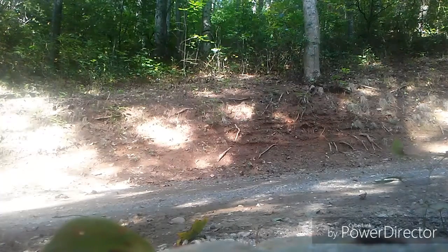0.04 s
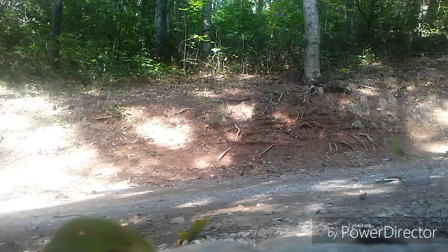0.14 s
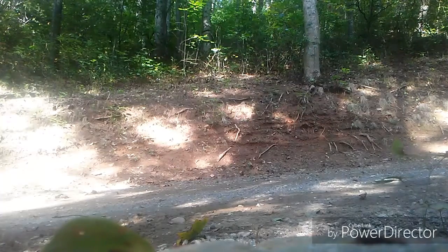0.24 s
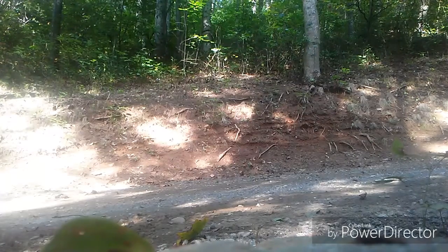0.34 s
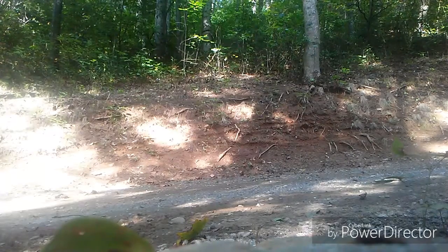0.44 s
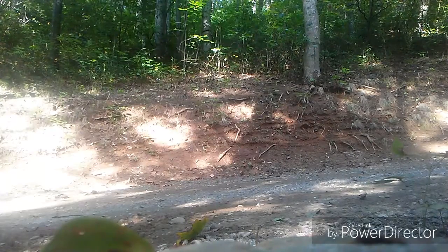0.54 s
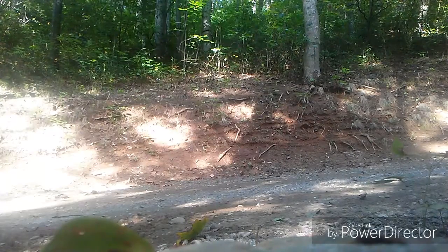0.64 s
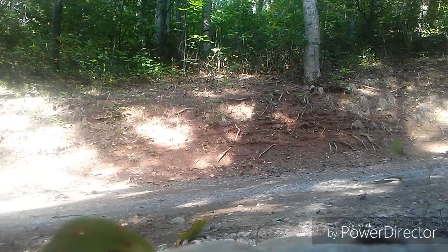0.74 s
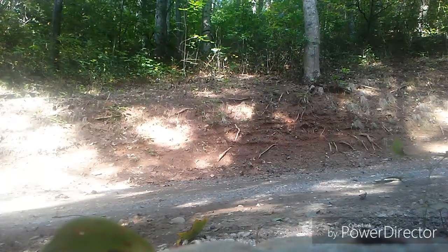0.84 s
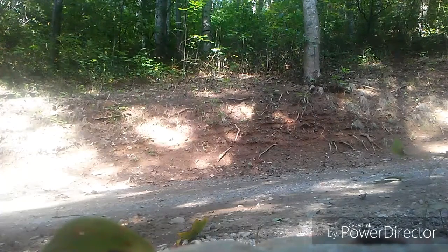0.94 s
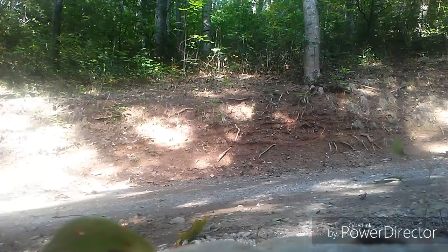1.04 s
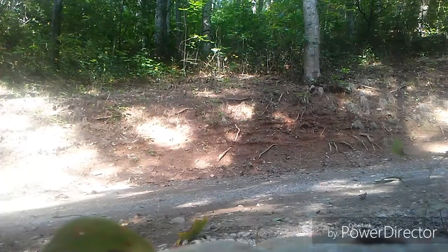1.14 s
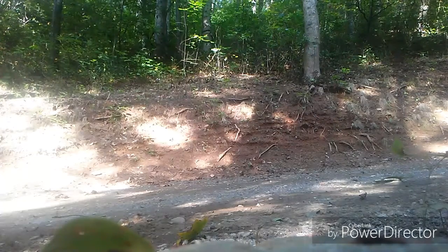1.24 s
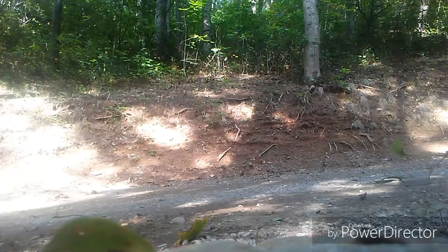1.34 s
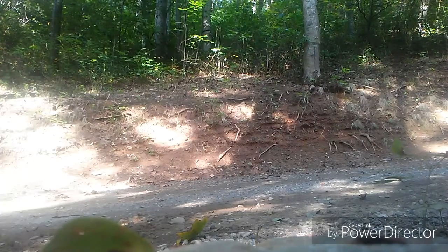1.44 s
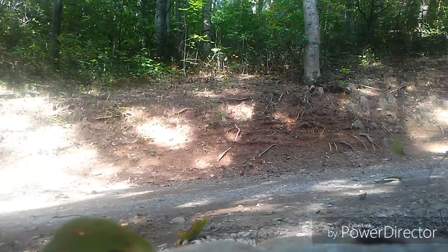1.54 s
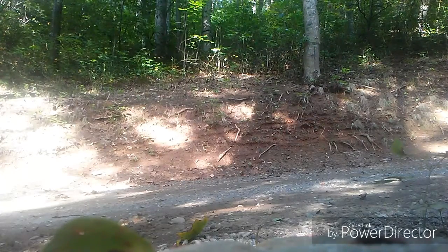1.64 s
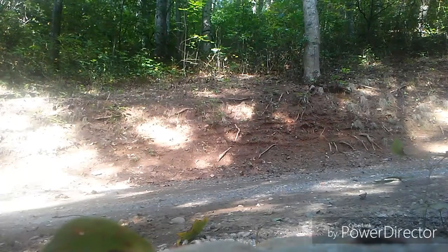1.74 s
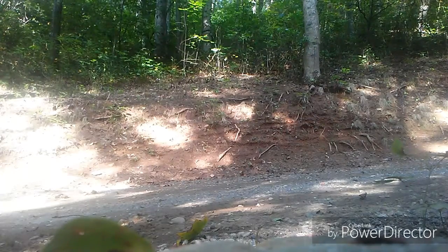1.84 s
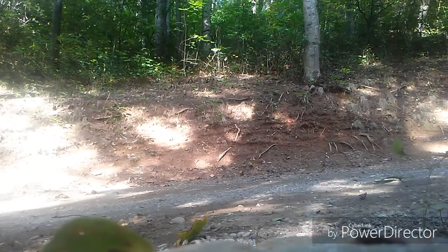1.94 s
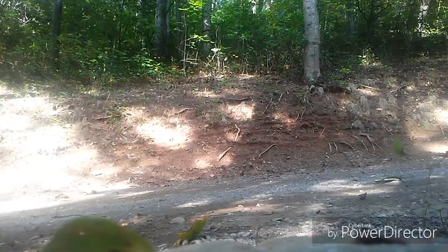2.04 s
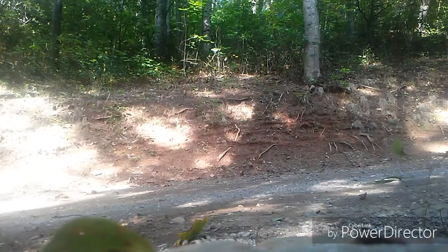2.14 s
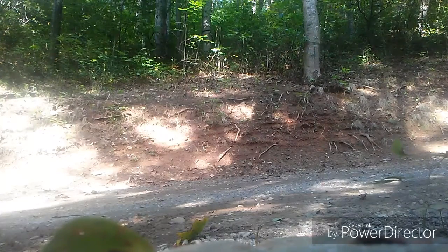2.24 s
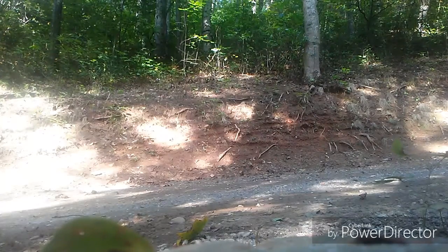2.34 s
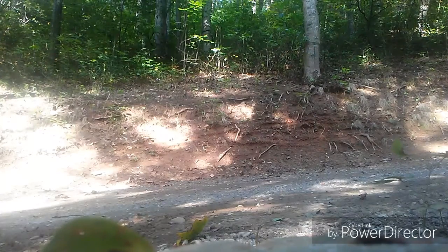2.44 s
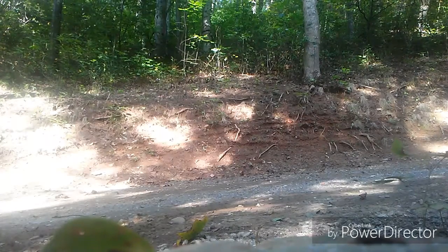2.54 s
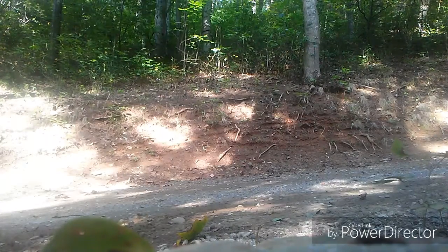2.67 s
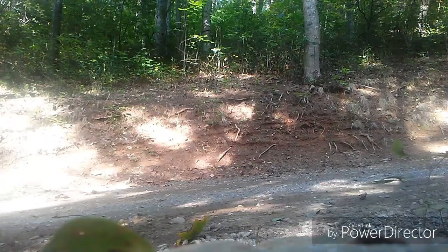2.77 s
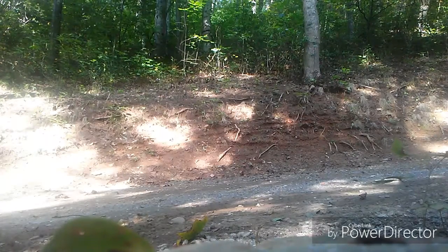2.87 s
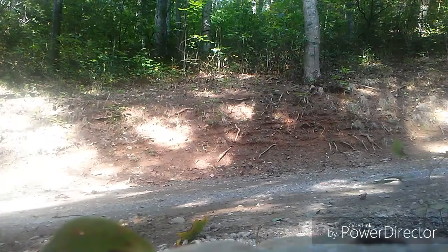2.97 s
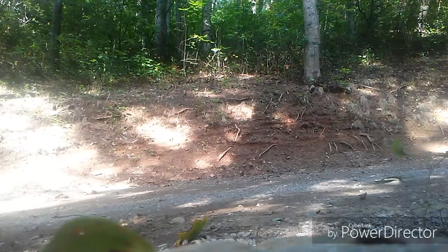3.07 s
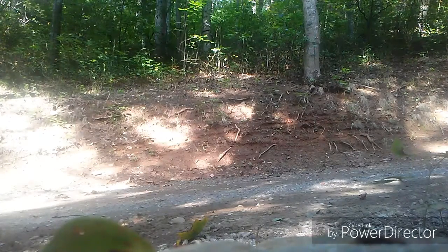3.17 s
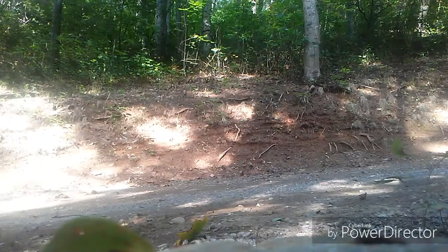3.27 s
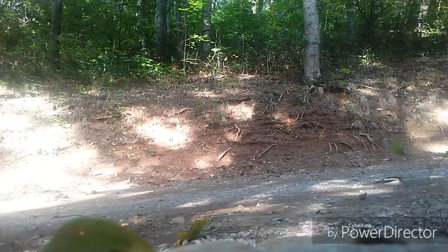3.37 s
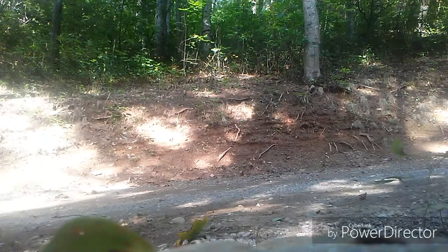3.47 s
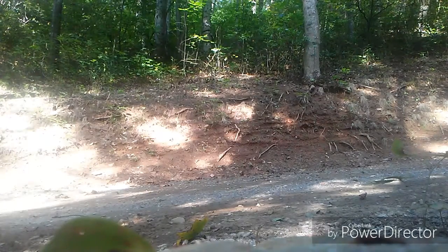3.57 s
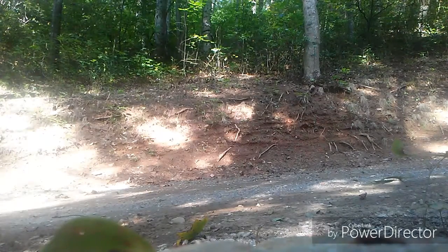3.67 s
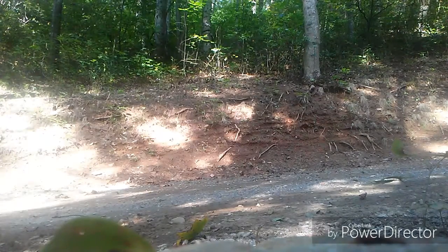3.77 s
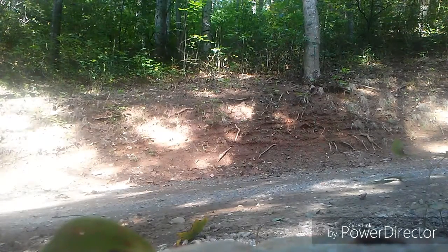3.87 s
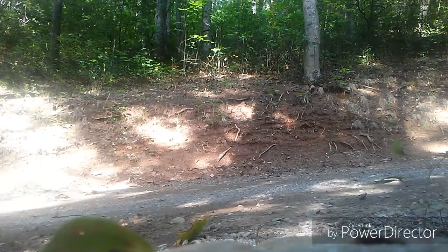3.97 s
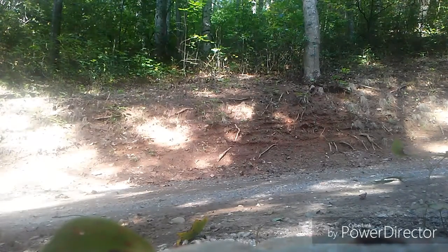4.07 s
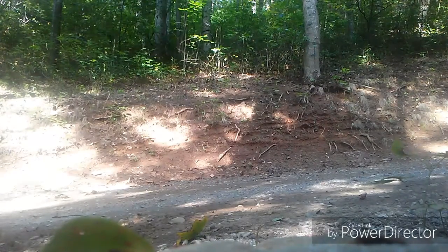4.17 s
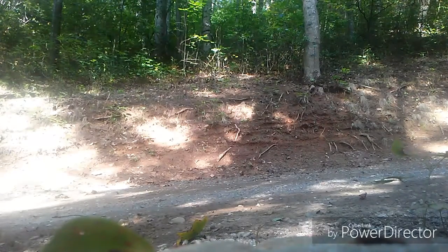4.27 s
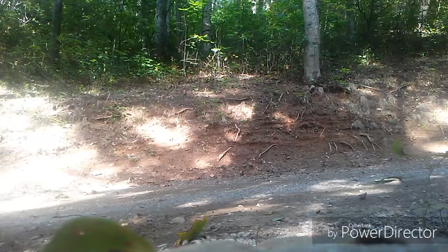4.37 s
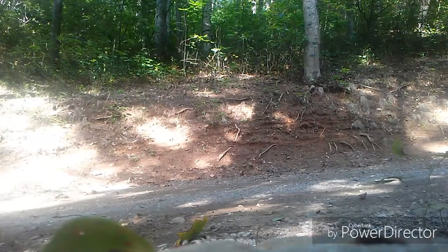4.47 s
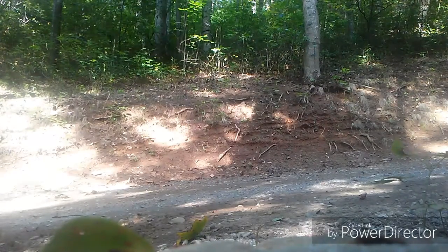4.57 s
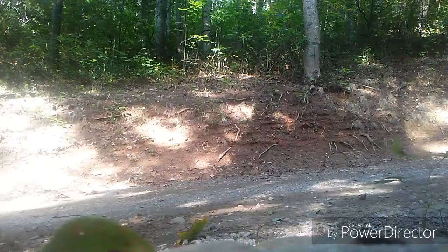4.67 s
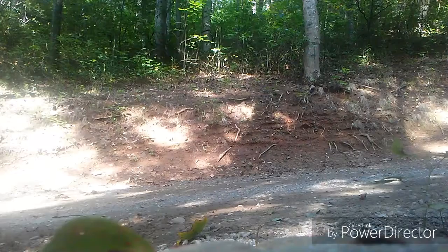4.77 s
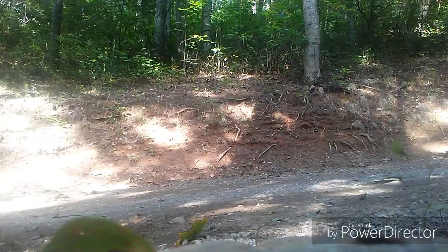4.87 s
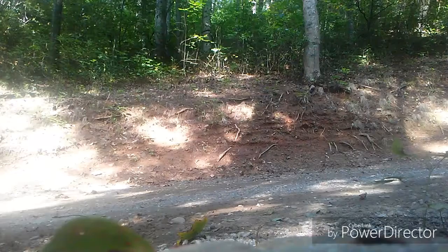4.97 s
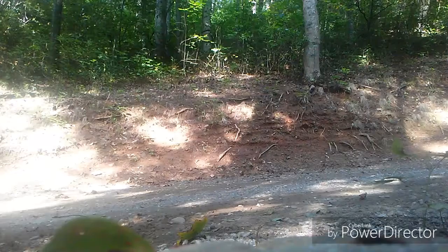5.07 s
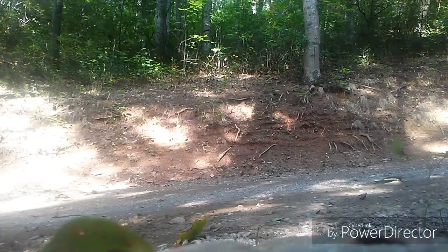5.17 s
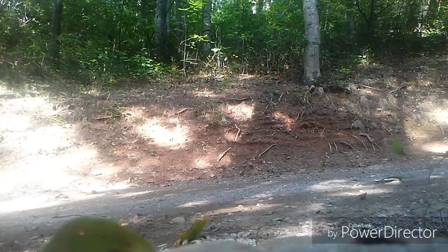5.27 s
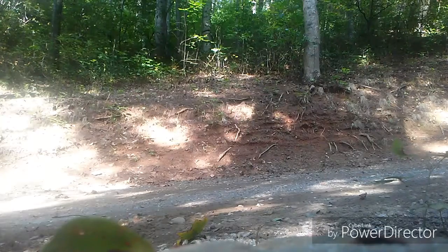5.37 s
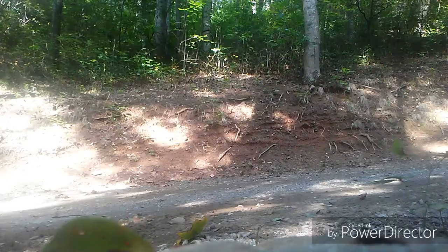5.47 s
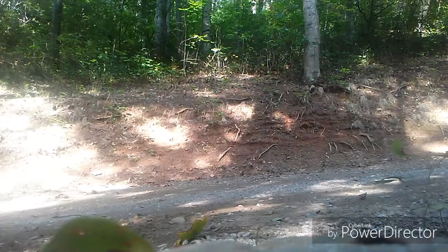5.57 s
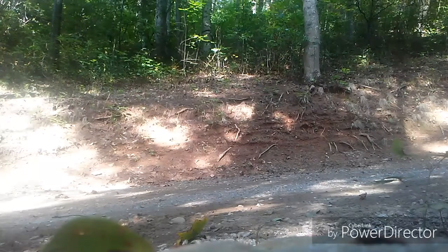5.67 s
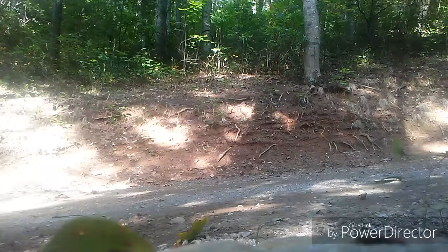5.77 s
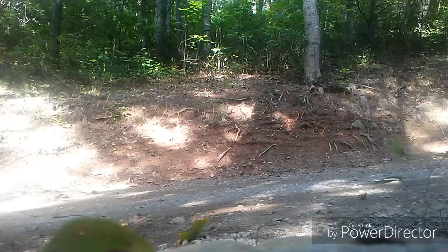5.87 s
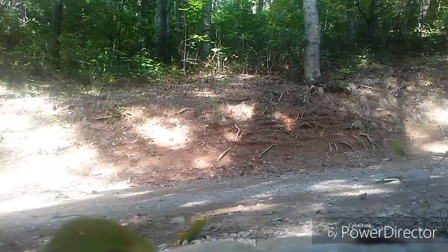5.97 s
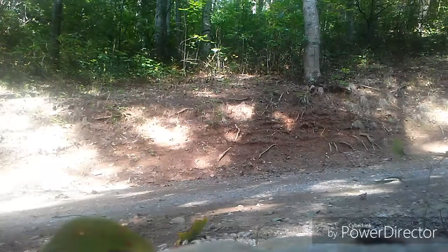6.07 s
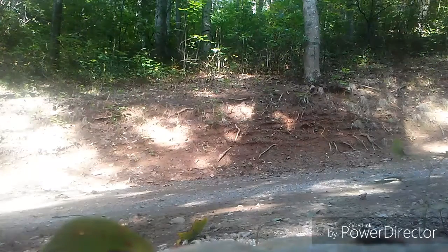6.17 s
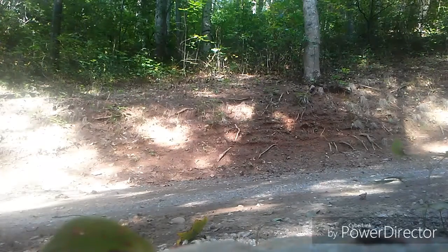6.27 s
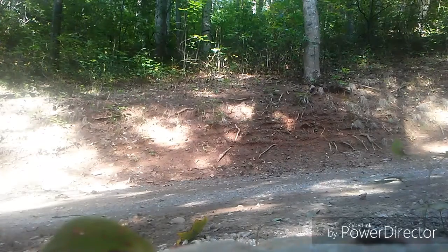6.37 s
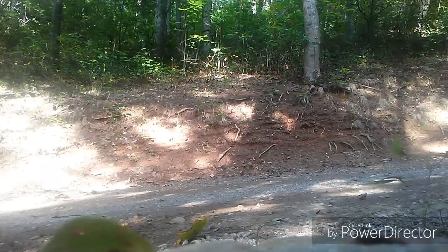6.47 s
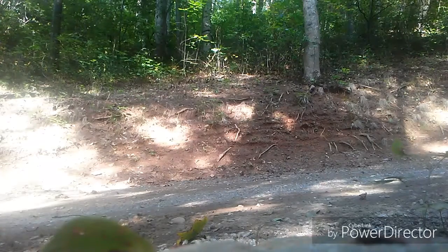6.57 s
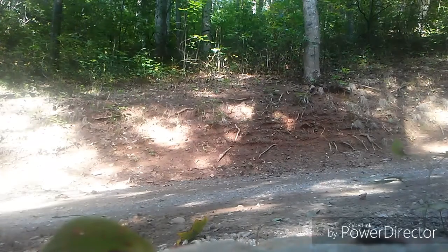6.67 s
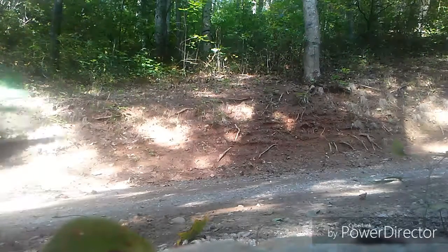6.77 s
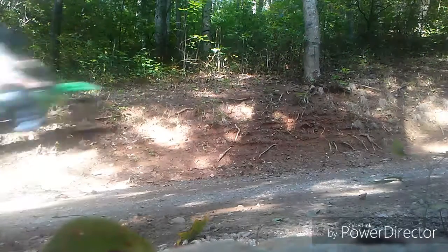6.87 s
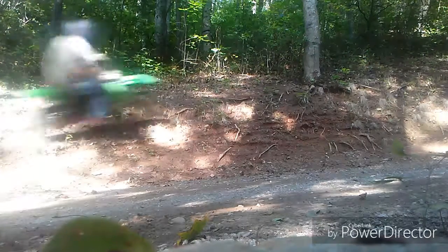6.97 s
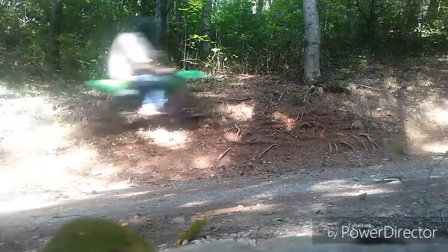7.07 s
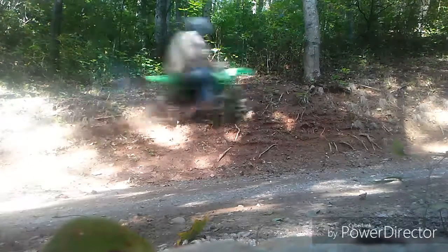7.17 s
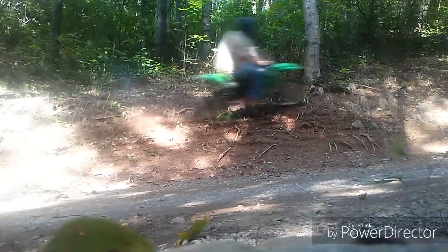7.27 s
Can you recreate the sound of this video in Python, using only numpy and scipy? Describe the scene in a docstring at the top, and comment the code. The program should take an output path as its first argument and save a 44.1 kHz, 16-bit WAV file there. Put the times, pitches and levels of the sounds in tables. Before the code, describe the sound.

A two-stroke dirt bike revs on and off through the woods, growing louder as it approaches and passes close by.

```python
"""Dirt bike on a forest trail

A small two-stroke works its way up through the trees, on and off the throttle, and passes close to the
microphone at the end. Each firing sends a pulse down the exhaust: a clean low drone, a bark above it
and a rasp of turbulent gas. The engine casing rings, and the trunks scatter all but the drone.
The microphone is deaf in a narrow band near 4.7 kHz."""
import sys
import numpy as np
from scipy import signal
from scipy.fft import rfft, irfft
from scipy.io import wavfile

SR = 44100
rng = np.random.default_rng(int(sys.argv[2]) if len(sys.argv) > 2 else 0)


def transcribe(u):
    """Save the signal u as a 16-bit wav file named by the first command-line argument.

    u: samples, shape (n,) or (channels, n), limited to [-1, 1]; the rate is SR.
    q: integer samples, one column per channel.
    """
    v = np.clip(np.atleast_2d(u).T, -1, 1)
    q = np.round(v * 32767).astype(np.int16)
    wavfile.write(sys.argv[1], SR, q)


N = 322812

# still air in the woods and microphone hiss: frequency_hz, relative_db
FLOOR_SPECTRUM = [(30,12),(200,19),(1000,16),(3000,2),(5500,8),(8200,-15),(8800,5),(9400,8),(15500,13)]
# low buffeting that grows as the bike nears: time_s, level_db
BUFFET_LEVEL = [(0,-93),(3,-93),(5.5,-86),(6.25,-62),(6.45,-49),(6.65,-55),(6.78,-66),(7.0,-70),(7.32,-50)]
# its colour: frequency_hz, relative_db
BUFFET_SPECTRUM = [(15,54),(30,-36),(70,-26),(120,7),(300,-21),(900,-59)]

# the ride from where we stand: time_s, echo_db (base echo over direct sound),
# behind (0-1, how far the tailpipe faces us), roughness (0-1, under power)
RIDE_PAST = [(0,0,0.06,0.91),(3,13,0.24,0.68),(5.55,-4.5,0.12,0.63),(5.75,1.5,0.03,.17),(6.62,2.5,0,0.26),(6.82,2,0.87,0.35),(7.32,4.5,1,0.1)]
# loudness of the bike, rising as it winds nearer and dipping where the revs drop: time_s, gain_db
APPROACH_GAIN = [(0, -26), (0.6, -29.5), (1.7, -22.5), (2.2, -16), (2.4, -19), (2.65, -15.5), (2.9, -21),
                 (4.15, -13), (4.36, -16), (4.52, -15.5), (4.9, -17.5), (5.65, -12.5), (6.05, -3.5),
                 (6.45, -3.5), (6.72, -6), (7, -1.44), (7.32, 0)]
# engine speed: time_s, firing_hz
ENGINE_SPEED = [(0.03, 87), (0.3, 71), (0.66, 71), (1.05, 87), (1.4, 97), (1.75, 118.4), (2.01, 180),
                (2.18, 183), (2.28, 148), (2.38, 124), (2.47, 165), (2.65, 189.4), (2.88, 136), (2.97, 130),
                (3.04, 116.7), (3.61, 134.4), (3.67, 145), (3.8, 142), (3.87, 158.4), (4.09, 168.0),
                (4.29, 160), (4.37, 135.5), (4.48, 156.4), (4.62, 128), (4.88, 122.7), (5.05, 129),
                (5.52, 127.0), (5.69, 124.5), (5.85, 126.7), (5.93, 139), (6.19, 125), (6.47, 131),
                (6.53, 121.7), (6.62, 132), (6.71, 134), (6.77, 121.3), (6.95, 123.5), (7.06, 112),
                (7.21, 110), (7.28, 119)]
# twists of the throttle: opens_s, shuts_s, strength_db, closing_time_s
THROTTLE_TWISTS = [(-0.1,0.076,-4.5,0.082),(0.096,.87,-9.5,.08),(0.819,1.726,-4.5,0.17),(1.718,2.173,-2.5,.035),(2.37,2.637,-0.5,0.022),(2.87,3.598,0,0.059),(3.598,4.145,1,0.023),(4.301,4.6,3.5,0.045),(4.6,5.417,-1.5,.25),
                   (5.692,5.902,6,.11),(6.008,6.185,0.5,0.048),(6.295,6.459,3,.12),(6.532,6.7,5.5,0.069),(6.74,6.852,-2,.05),(6.86,6.988,0.5,0.084),(6.999,7.401,-4.5,.08)]

# gain of the rasp around 2.5 kHz and the hiss above 6 kHz: time_s, rasp_db, hiss_db
TREBLE_GAIN = [(0.0, -51, -69), (0.04, -53, -79), (0.44, -57.5, -83.5), (1.75, -50.5, -67),
               (2.16, -39.5, -52), (2.36, -45, -60.5), (2.64, -41, -52), (2.87, -46.5, -62.5),
               (3.35, -44, -58.5), (4.14, -35.5, -46), (4.36, -43.5, -58), (4.5, -35.5, -47),
               (4.85, -39.5, -52), (5.67, -38.5, -51.5), (5.94, -31.5, -44.5), (6.62, -27, -40.5),
               (6.66, -30.5, -42.5), (6.88, -26, -36.5), (7.17, -29, -41.5), (7.25, -24.5, -40)]
# high hiss, heard from in front and from behind: frequency_hz, relative_db
HISS_FRONT = [(4700,-23),(5300,-25),(5900,-16.5),(6500,-8),(7400,-4),(9500,-8),(11000,-13.5),(12700,-20),(14000,-23),(15500,-30)]
HISS_REAR = [(4700,-37),(5300,-15),(5900,-0.5),(6500,5.5),(7400,3),(9500,-0.5),(11000,-2.5),(12700,-13),(14000,-15.5),(15500,-37)]
# thin metallic rings at close range: pitch_hz, width_hz, relative_db
SIZZLE_MODES = [(7460,260,-5),(8670,420,3.5),(11900,300,-0.5),(13200,300,-9)]
# turbulent exhaust gas, from in front and from behind: frequency_hz, relative_db
RASP_FRONT = [(900,-22),(1600,7),(2100,4),(2450,2),(2800,2.5),(3150,-1),(3550,0.5),(4000,-7),(4400,-52),(6000,-50)]
RASP_REAR = [(900,-8.5),(1500,5.5),(2000,3),(2220,-4.5),(2450,-5),(2750,-8),(3050,-25),(3400,-13),(3720,-4),(4000,-7),(4400,-48),(6000,-52)]
# resonances of the engine casing: pitch_hz, width_hz, relative_db
CASING_MODES = [(1564,33,-3),(2133,23,-3),(2795,93,2),(3456,41,-2.5)]
# the knocks that shake it: frequency_hz, relative_db
KNOCK_SPECTRUM = [(800,-10),(1500,-1),(3700,0),(5000,-34)]
# ring of the tailpipe: pitch_hz, width_hz
TAILPIPE_MODE = (2215, 36)

# bark of clean firings, gas puffs and chamber boom of ragged ones: frequency_hz, relative_db
BARK_SPECTRUM = [(60,-92),(380,-31),(520,4),(660,1),(800,1),(1000,-0.5),(1250,-5.5),(1700,-12),(2200,-18),(3000,-25),(4200,-68),(6000,-72)]
PUFF_SPECTRUM = [(30,-54),(60,-47.5),(130,0),(250,2.5),(380,6.5),(520,-1.5),(680,6),(900,-2.5),(1400,1),(1900,-13.5),(2600,-17.5),(4000,-16),(6000,-74)]
BOOM_SPECTRUM = [(40,-61),(120,-26.5),(230,-10.5),(330,2),(430,0.5),(520,4),(600,-10.5),(750,-26),(1500,-59)]
# pipe resonances that the drone sweeps through: frequency_hz, gain_db
PIPE_RESPONSE = [(70,-37),(100,-26),(130,-19.5),(180,-11.5),(225,-13.5),(270,-18),(330,-19),(390,-17),(450,-18),(525,-16.5),(570,-30),(700,-22)]
# orders 1 to 4 of the firing rate: relative_db
DRONE_ORDERS = [-3.5, 2.0, -1, -0.5]
# brightness of the drone, pivoting on the second order: time_s, tilt_db_per_order
DRONE_BRIGHTNESS = [(0,-7),(2.6,-2),(3.1,0),(4.2,-0.5),(4.8,-1.5),(5.9,0.5),(6.6,4.5),(7.32,2.5)]
# brief dip of the odd orders as the bike goes by: centre_s, half_width_s, gain_db
ODD_ORDER_DIP = (7.13, 0.044, -25)

OPENING_S, IDLE_DRIVE = 0.088, 0.31  # time to open the throttle; exhaust drive with it shut
SHUT_ROUGHNESS = 0.39  # extra raggedness of the firings off the throttle
BARK_DB, BARK_PER_DRIVE, BARK_PER_APPROACH = -15.0, 0.44, 1.312  # base level; slopes in dB per dB
FLOOR_DB, CUTOFF_HZ = -69.5, 15500


def from_db(db):
    """Decibels to gain."""
    return 10 ** (np.asarray(db) / 20)


def rms_one(x):
    """Scale to unit rms."""
    return x / np.sqrt(np.mean(x ** 2) + 1e-20)


def in_time(rows):
    """One value per sample for each column of a curve."""
    time_s, *columns = np.transpose(rows)
    return [np.interp(np.arange(N) / SR, time_s, column) for column in columns]


def drift(rate_hz):
    """Smooth random wander, mostly slower than rate_hz; rms 1."""
    pole = np.exp(-80 * np.pi * rate_hz / SR)
    slow = signal.lfilter([1], [1, -2 * pole, pole * pole], rng.standard_normal(N // 40 + 2002))[2000:]
    return np.interp(np.arange(N) / 40, np.arange(len(slow)), rms_one(slow))


def colour(x, spectrum, size=4096):
    """Minimum-phase filter with the given spectrum; rms 1."""
    hz, db = np.transpose(spectrum)
    grid_hz = np.maximum(np.arange(size // 2 + 1) * SR / size, 1)
    cepstrum = irfft(np.log(from_db(np.interp(np.log(grid_hz), np.log(hz), db))))
    response = irfft(np.exp(rfft(2 * cepstrum[:size // 2], size)))
    return rms_one(signal.fftconvolve(x, response)[:N])


def resonate(x, hz, width_hz):
    """One resonance; rms 1."""
    r = np.exp(-np.pi * width_hz / SR)
    return rms_one(signal.lfilter([1, 0, -1], [1, -2 * r * np.cos(2 * np.pi * hz / SR), r * r], x))


def blend(a, b, share):
    """Equal-power cross-fade from a to b."""
    share = np.clip(share, 0, 1)
    return np.sqrt(1 - share) * a + np.sqrt(share) * b


def still_air():
    """The steady bed: quiet woods and the microphone's own hiss."""
    return from_db(FLOOR_DB) * colour(rng.standard_normal(N), FLOOR_SPECTRUM)


def buffeting():
    """A low, unsteady rumble that comes up when the bike is close."""
    level_db, = in_time(BUFFET_LEVEL)
    return from_db(level_db + 2.5 * drift(7)) * colour(rng.standard_normal(N), BUFFET_SPECTRUM)


def woods(x, wet_db, t60_s, count=260):
    """Direct sound plus many weak echoes from trunks and banks, fading with their delay."""
    delay_s = rng.uniform(.004, .4, count)
    echoes = np.zeros(SR)
    echoes[(delay_s * SR).astype(int)] = rng.standard_normal(count) * from_db(-60 * delay_s / t60_s)
    wet = signal.fftconvolve(x, echoes / np.linalg.norm(echoes))[:N]
    return blend(x, wet, 1 / (1 + from_db(-wet_db) ** 2))


def throttle():
    """How far the throttle is open (0-1) and the exhaust pressure that this drives (dB)."""
    t = np.arange(N) / SR
    opening, drive = 0, IDLE_DRIVE
    for opens_s, shuts_s, strength_db, closing_s in THROTTLE_TWISTS:
        twist = np.clip((t - opens_s) / OPENING_S, 0, 1) * np.clip(1 - (t - shuts_s) / closing_s, 0, 1)
        opening += twist
        drive += from_db(strength_db) * twist
    return np.clip(opening, 0, 1), 20 * np.log10(drive)


def crank(firing_hz, wobble):
    """Turns of the crank, one firing each; the speed is never quite even."""
    return np.cumsum(firing_hz * (1 + wobble * drift(35))) / SR


def firings(turns, firing_hz, uneven_db, jitter_s):
    """One pressure pulse each time the exhaust port opens, uneven in strength and timing."""
    on_time = np.interp(np.arange(1, int(turns[-1])), turns, np.arange(N))
    timing, strength = rng.standard_normal((N, 2))[:len(on_time)].T
    onsets = np.clip(on_time + timing * jitter_s * SR, 0, N - 1).astype(int)
    pulses = np.zeros(N)
    pulses[onsets] = from_db(uneven_db * strength)
    return pulses / np.sqrt(firing_hz)


def gas(turns, fade_turns, steady):
    """Turbulence that bursts out with each firing, on top of a steady flow."""
    return rng.standard_normal(N) * (steady + np.exp(-(turns % 1) / fade_turns))


def sizzling_hiss(turns, behind, nearness):
    """A high hiss, with high metal rings that come and go as the nearby bike jolts."""
    front = colour(gas(turns, fade_turns=.3, steady=3.4), HISS_FRONT)
    rear = colour(gas(turns, fade_turns=.3, steady=3.4), HISS_REAR)
    shake = colour(gas(turns, fade_turns=.2, steady=0.55), HISS_FRONT)
    rings = sum(from_db(db + 3.4 * drift(5.7)) * resonate(shake, hz, width)
                for hz, width, db in SIZZLE_MODES)
    return blend(front, rear, behind) + from_db(-13.0) * nearness * rings


def exhaust_rasp(turns, firing_hz, behind):
    """Turbulent gas and ringing metal: the casing faces the microphone first, then the tailpipe."""
    knocks = colour(gas(turns, fade_turns=0.15, steady=0.18), KNOCK_SPECTRUM)
    ringing = rms_one(sum(from_db(db) * resonate(knocks, hz, width) for hz, width, db in CASING_MODES))
    casing = from_db(0.94) * (firing_hz / 170) ** 2.65 * ringing  # rings harder at high revs
    front = from_db(2.18) * colour(gas(turns, fade_turns=1.0, steady=1.0), RASP_FRONT) + casing
    pulses = firings(turns, firing_hz, uneven_db=3.5, jitter_s=.00002)
    tailpipe = from_db(-3.0) * resonate(pulses, *TAILPIPE_MODE)
    rear = from_db(3.0) * colour(gas(turns, fade_turns=0.5, steady=0.98), RASP_REAR) + tailpipe
    return blend(front, rear, behind)


def exhaust_sputter(turns, firing_hz, rough):
    """Ragged firings puff out gas and boom in the expansion chamber."""
    puff = from_db(3.5) * colour(gas(turns, fade_turns=0.14, steady=0.54), PUFF_SPECTRUM)
    pulses = firings(turns, firing_hz, uneven_db=3.0, jitter_s=0.00017)
    boom = from_db(4.0) * colour(pulses, BOOM_SPECTRUM)
    low_cut = signal.butter(4, 120, "high", fs=SR, output="sos")
    return signal.sosfilt(low_cut, rough * (puff + boom))


def exhaust_bark(turns, firing_hz, rough):
    """Evenly timed pulses give the pipe a pitched bark, strongest when the engine runs clean."""
    pulses = firings(turns, firing_hz, uneven_db=3.0, jitter_s=.000015)
    return from_db(0.87) * np.sqrt(1 - rough ** 2) * colour(pulses, BARK_SPECTRUM)


def order_level(order, firing_hz):
    """An order of the drone swells as the revs carry it through a resonance of the pipe; dB."""
    hz, pipe_db = np.transpose(PIPE_RESPONSE)
    resonance_db = np.interp(np.log(order * firing_hz), np.log(hz), pipe_db)
    tilt_db, = in_time(DRONE_BRIGHTNESS)
    centre_s, half_width_s, depth_db = ODD_ORDER_DIP
    dip_db = depth_db * np.exp(-((np.arange(N) / SR - centre_s) / half_width_s) ** 2)
    return resonance_db + tilt_db * (order - 2) + dip_db * (order % 2)


def exhaust_drone(turns, firing_hz, rough, gain_db):
    """The lowest orders leave the pipe as tones; ragged firings shake the higher ones most."""
    stumble_db = 0.75 * rough * drift(50)
    shake_turns = 0.042 * rough * drift(20)
    tones = np.zeros(N)
    for order, base_db in enumerate(DRONE_ORDERS, 1):
        flutter_db = (order - 1) * stumble_db + 1.3 * rough * order * drift(12.5)
        level_db = gain_db + base_db + order_level(order, firing_hz) + flutter_db
        cycles = order * turns + (order - 1) * shake_turns - 0.063 * order ** 2  # higher orders lag
        tones += np.sqrt(2) * from_db(level_db) * np.cos(2 * np.pi * cycles)
    # the drone keeps no deep bass below about 50 Hz
    return signal.sosfilt(signal.butter(3, 50, "high", fs=SR, output="sos"), tones)


def dirt_bike():
    """One crank times every voice of the engine; each reaches the microphone through the trees."""
    firing_hz, = in_time(ENGINE_SPEED)
    approach_db, = in_time(APPROACH_GAIN)
    rasp_db, hiss_db = in_time(TREBLE_GAIN)
    echo_db, behind, rough = in_time(RIDE_PAST)
    opening, drive_db = throttle()
    pulse_gain = from_db(BARK_DB + BARK_PER_DRIVE * drive_db + BARK_PER_APPROACH * approach_db)
    nearness = 1 / np.sqrt(1 + from_db(echo_db) ** 2)  # share of the sound that comes directly
    rough = np.clip(rough + SHUT_ROUGHNESS * (1 - opening), .05, .98)
    turns = crank(firing_hz, wobble=.002)
    drone = exhaust_drone(turns, firing_hz, rough, approach_db + drive_db)
    bark = pulse_gain * exhaust_bark(turns, firing_hz, rough)
    sputter = pulse_gain * exhaust_sputter(turns, firing_hz, rough)
    rasp = from_db(rasp_db - 2.5) * exhaust_rasp(turns, firing_hz, behind)
    hiss = from_db(hiss_db - 0.37) * sizzling_hiss(turns, behind, nearness)
    return (drone  # its long waves pass between the trunks unscattered
            + woods(bark, 2.0 * echo_db - 1.5, t60_s=0.52)
            + woods(sputter, echo_db + 8.0, t60_s=0.58)
            + woods(rasp, echo_db - 11.5, t60_s=0.89)
            + woods(hiss, echo_db - 19, t60_s=.25))


def scene():
    """The bike and the quiet woods, heard from beside the trail."""
    return dirt_bike() + buffeting() + still_air()


def record(dry):
    """The microphone rounds the peaks, has a deep notch and cuts the top."""
    rounded = dry / (1 + (dry / 1.05) ** 6) ** (1 / 6)
    notch = signal.cheby2(3, 22, [4450, 4830], "bandstop", fs=SR, output="sos")
    top_cut = signal.ellip(10, .1, 80, CUTOFF_HZ, fs=SR, output="sos")
    return signal.sosfilt(top_cut, signal.sosfilt(notch, rounded))


dry = scene()
out = record(dry)
transcribe(out)
```